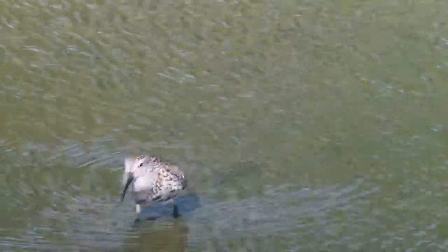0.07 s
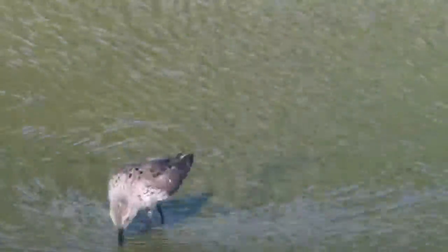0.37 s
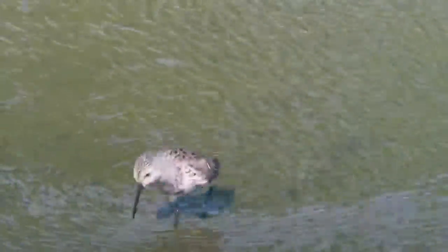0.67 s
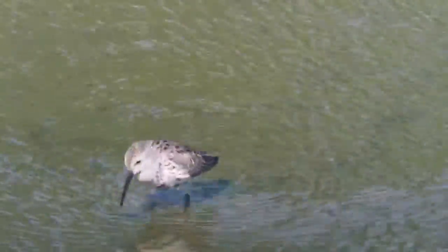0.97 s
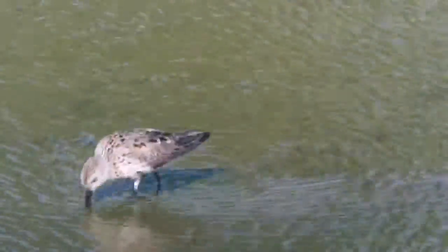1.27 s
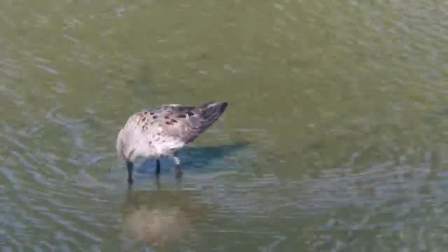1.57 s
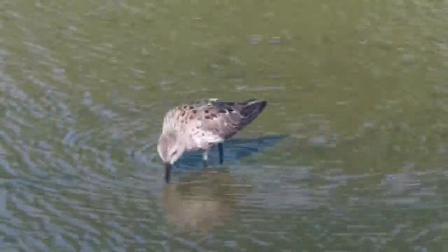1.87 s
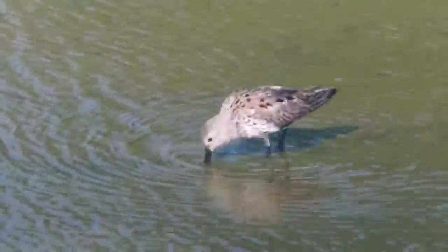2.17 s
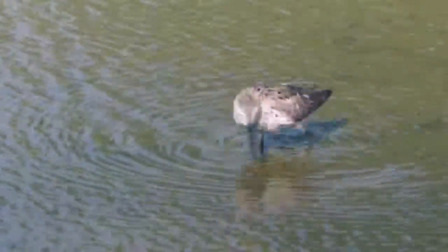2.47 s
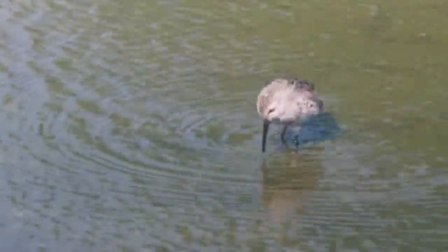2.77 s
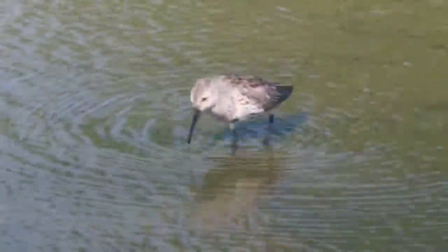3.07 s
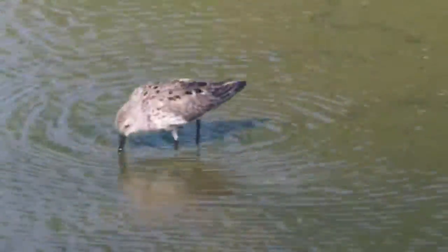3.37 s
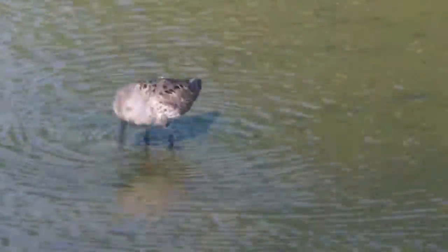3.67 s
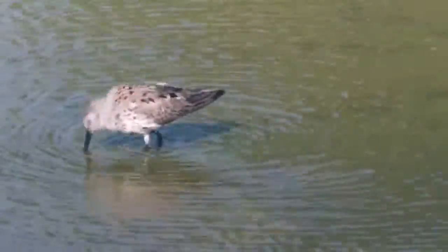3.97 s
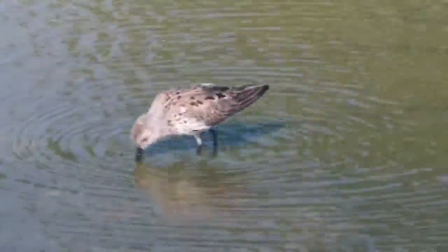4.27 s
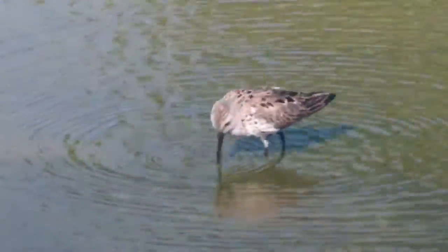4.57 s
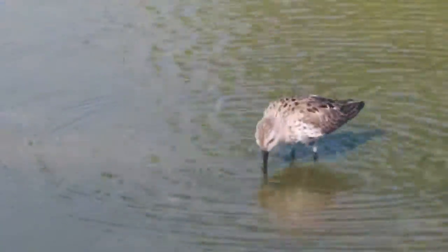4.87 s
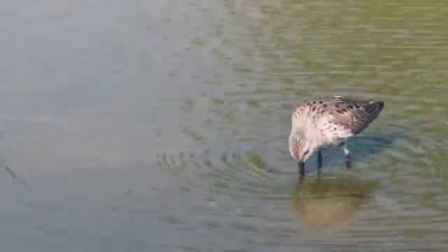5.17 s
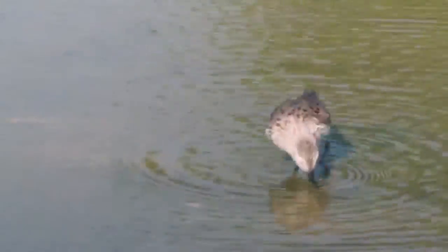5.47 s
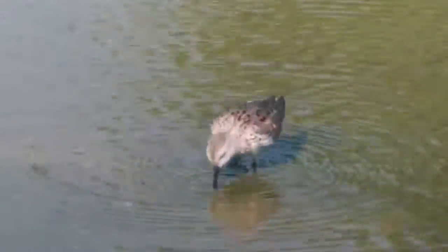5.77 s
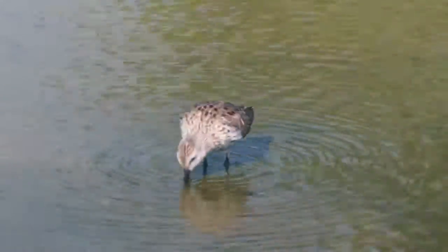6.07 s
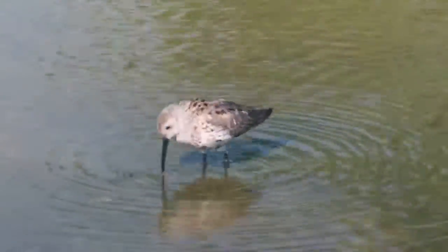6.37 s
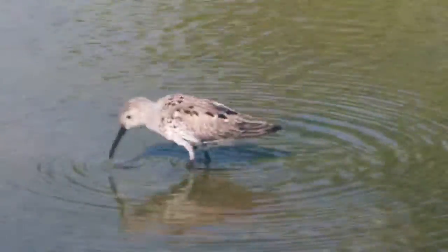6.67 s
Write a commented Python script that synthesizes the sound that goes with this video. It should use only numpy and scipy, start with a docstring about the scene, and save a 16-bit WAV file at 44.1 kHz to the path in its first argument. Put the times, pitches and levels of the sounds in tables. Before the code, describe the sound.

The sound cuts in almost at once with a puff of wind on the microphone, low rumbles and thumps jumping between left and right. Behind it lie a soft outdoor hiss and a far machine's low drone and thin hum. Distant shorebirds give faint, short, high peeps from 0.2 to 1.8 seconds. The wind buffets unevenly, then swells into its main gust from about 2.2 to 3.7 seconds, fluttering and sputtering, strongest near 2.8, while the background sinks beneath it. By about 4.3 seconds the wind has dropped and the hiss and machine come back, much quieter than the gust, broken by soft bass puffs. The drone swells briefly near 5.3 seconds. A few tiny dry ticks sound close by, the clearest at 5.4 and another at 6.5. The hum rises slightly before the end at about 6.8 seconds.

```python
"""Wind buffets the left and right openings (ports) of a microphone beside shallow water.
Swirls of air, called eddies, cross the ports: large ones rumble, small ones flutter, hard ones thump.
The wind veers from side to side, swells, and drops after four seconds. Behind it are an outdoor hiss,
the drone and hum of a far machine, distant bird peeps and a few tiny ticks.
The hiss and the machine sink under the gust and come back as the air calms."""
import sys
import numpy as np
from scipy import signal
from scipy.fft import rfft, irfft, next_fast_len
from scipy.io import wavfile
from scipy.ndimage import uniform_filter1d, map_coordinates

SR = 44100
rng = np.random.default_rng(int(sys.argv[2]) if len(sys.argv) > 2 else 0)


def waveform_to_disk(signal):
    """Save audio, clipped to [-1, 1], as 16-bit WAV at the path in sys.argv[1]."""
    frames = np.transpose(np.atleast_2d(signal))
    scaled = np.clip(frames, -1, 1) * 32767
    samples = np.round(scaled).astype(np.int16)
    wavfile.write(sys.argv[1], SR, samples)


N = 300762

# the background sinks under the gust and returns in the calm: time_s, gain_db
BACKGROUND_DIP = [(0.17, -3), (0.28, 0), (0.7, -1.5), (1.2, -1.1), (1.42, -2.5), (2.4, -4.5), (3.2, -3),
                  (3.42, -7), (5.05, 0.5), (5.9, 0), (6.8, 1.46)]
# the machine's hum rises and falls, and is strongest at the end: time_s, gain_db
HUM_RISE = [(0.2, -4.5), (0.55, 1), (1.6, -3), (2.65, 0.5), (3.6, -2), (4.6, -2), (5.25, 0.5), (5.6, 0.1),
            (5.9, -1.5), (6.25, -2), (6.62, 2.5), (6.8, 3.5)]


def wind(breakup_db=-17, rumble_boost_db=20, rumble_limit_db=-12.5):
    """Large eddies rumble; faster air breaks them into small ones that flutter, flap and sputter."""
    # wind strength through a first puff, a lull, the main gust and calm: time_s, level_db
    gust = [(0.18, -39), (0.4, -26), (0.52, -38), (0.8, -40), (1.1, -33.5), (1.27, -36.5), (1.37, -34.5),
            (1.46, -39), (1.56, -38), (1.67, -32), (1.85, -32), (1.96, -32), (2.12, -33.5), (2.24, -25.5),
            (2.39, -25.5), (2.58, -21.5), (2.78, -20.5), (3.12, -26), (3.28, -25), (3.7, -27.5),
            (3.88, -37.5), (4.3, -45), (4.6, -57.5), (6.8, -72.5)]
    # the wind swings from port to port: time_s, left_minus_right_db
    veer = [(0.22, -21), (0.36, 7), (0.72, 5), (0.93, 5), (1.5, -16.5), (1.76, -3.5), (2.0, -11), (2.3, -8),
            (2.45, 2), (2.8, 1), (3.1, 5), (3.45, -3), (3.95, 4.5), (4.45, 6.5)]
    # tone of the large eddies: frequency_hz, level_db
    rumble_tone = [(8, -8.5), (22, -3), (50, 3.5), (90, -1), (140, -4.5), (200, -9), (300, -16.5),
                   (500, -56), (1000, -88.5)]
    # tone of the small eddies: frequency_hz, level_db
    flutter_tone = [(90, -18), (170, -1), (260, 2), (380, 0), (500, -18), (640, -12), (830, -30),
                    (1050, -35), (1500, -50), (2200, -64), (5000, -80)]
    strength = amp(curves(gust))
    port_db = np.array([[.5], [-.5]]) * curves(veer)
    lumps_db = 2 * np.array([wobble(32), wobble(32.09)])  # quick, different on each port
    surges_db = wobble(9.1)  # slower, the same on both
    push = strength * amp(rumble_boost_db)
    push = push / np.hypot(1, push / amp(rumble_limit_db))  # the rumble levels off
    push = push / np.hypot(1, strength / amp(breakup_db))  # and thins as large eddies break up
    push = push * amp(0.61 * curves(BACKGROUND_DIP) + 0.8 * port_db)  # partly follows dip and veer
    rumble = push * turbulence(rumble_tone, burst_db=2.5, burst_rate=49, even_s=0.09)
    flutter = amp(-1) * turbulence(flutter_tone, burst_db=8.5, burst_rate=110, even_s=0.078)
    flaps = amp(-7.5) * small_eddies(per_second=130, pitch_hz=236, octaves=0.53)
    sputter_gain = amp(-15.5) * strength / amp(breakup_db)  # stands out at the height of the gust
    sputter = sputter_gain * small_eddies(per_second=200, pitch_hz=410, octaves=0.25)
    small_swirls = strength * amp(port_db) * (flutter + flaps + sputter)
    return unit(amp(lumps_db + surges_db)) * (rumble + small_swirls)


def turbulence(tone, burst_db, burst_rate, even_s):
    """Churning air gives each port its own noise in short bursts, evened out over even_s seconds."""
    bursts = amp(burst_db * np.array([wobble(burst_rate), wobble(burst_rate)]))
    pressure = filtered(bursts * rng.standard_normal((2, N)), lambda hz: amp(along(tone, hz)))
    power = np.abs(uniform_filter1d(pressure ** 2, max(int(even_s * SR), 64), axis=1))
    return unit(pressure / np.sqrt(uniform_filter1d(power, SR // 30, axis=1) + 1e-20))


def eddy(t, hz):
    """One eddy crosses a port: a sharp dip in pressure between two soft rises."""
    distance_squared = (np.pi * hz * t) ** 2
    return (3 * distance_squared - 1) / (1 + distance_squared) ** 3


def small_eddies(per_second, pitch_hz, octaves, max_count=3000):
    """Eddies of random size and strength hit each port at random moments."""
    out, near = np.zeros((2, N)), np.arange(-SR // 100, SR // 100)
    for port in out:
        chance = rng.random((max_count, 3))[:int(per_second * N / SR)]
        samples = (chance[:, :1] * N).astype(int) + near
        hz = pitch_hz * 2 ** (octaves * (2 * chance[:, 1:2] - 1))
        strength = np.sqrt(-np.log(1 - chance[:, 2:]) / hz)  # smaller, higher eddies are weaker
        pulses = strength * eddy(near / SR, hz)
        port += np.bincount((samples % N).ravel(), pulses.ravel(), N)
    return unit(out)


def buffets(thump_db=-2.5, puff_db=-17.5, puff_width_s=0.015, puff_lag_s=0.00091, puff_octaves=0.71):
    """The hardest eddies thump, most of them to one side, each inside a short puff of swirling air."""
    # the hardest eddies: time_s, level_db, pitch_hz, left_share (0 to 1)
    hard_eddies = [(0.178, -3.5, 118, 0), (0.2, -12, 58, 0), (0.233, -3.5, 175, 0.05), (0.249, -9, 200, 0),
                   (0.312, -2, 167, 1), (0.331, -8.5, 260, 1), (0.4, -3.5, 139, 0.36), (0.426, 1, 252, 1),
                   (0.574, 1, 195, 0.95), (0.585, -0.5, 57.7, 0.7), (0.621, -7, 85, 0.7),
                   (0.690, 1.5, 76, 0.3), (0.709, -11, 225, 0.15), (0.866, -1, 58, 0.6),
                   (0.876, -2, 214, 0.92), (0.887, -5.5, 104, 0.8), (0.929, -11, 115, 0.7),
                   (0.954, -17, 215, 1), (1.094, -4, 116, 0.26), (1.138, -3, 58, 0.9),
                   (1.147, -3.5, 101, 0.9), (1.354, -3, 146, 0.03), (1.372, 0.5, 124, 0.16),
                   (1.483, -21, 240, 0), (1.605, -2, 62, 0), (1.612, -3.5, 140, 0.04),
                   (1.709, -6.5, 146, 1), (1.764, -6, 111, 0.6), (1.775, -11.5, 180, 0),
                   (1.795, -8, 190, 0.8), (1.881, 1, 55.7, 0.3), (1.896, 3.5, 94, 0.37),
                   (1.906, -6, 118, 0), (1.934, -0.5, 130, 0.2), (2.001, 0, 163, 0), (2.01, -8, 280, 0),
                   (2.027, -2, 220, 0.03), (2.058, 0, 58, 0), (2.2, -10, 185, 0.1), (2.218, 1, 174, 0.83),
                   (2.29, 0.5, 102, 0), (2.297, 1.5, 126, 0.12), (2.323, -3.5, 362, 0.13),
                   (2.346, -4.5, 251, 0.2), (2.389, -12, 320, 0.86), (2.413, -1.5, 58, 1),
                   (2.435, -5, 286, 1), (2.471, -6.5, 300, 0.2), (2.494, -6.5, 358, 0.8),
                   (2.528, -6, 358, 0.24), (2.539, -4, 62, 1), (2.547, -6.5, 340, 0.9),
                   (2.611, -7.5, 279, 0.94), (2.633, -7.5, 420, 0.8), (2.671, -7, 360, 0),
                   (2.675, -1.5, 322, 0.87), (2.742, -17, 430, 0.2), (2.754, -0.5, 220, 0.9),
                   (2.770, -4, 386, 0), (2.812, 0, 60, 1), (2.822, -2, 212, 0), (2.841, -6, 260, 0.2),
                   (2.878, -4, 228, 0.85), (2.903, 3, 190, 0.88), (2.926, -11, 340, 0),
                   (2.941, -12, 430, 0.75), (2.975, -4.5, 307, 0.83), (3.0, -10.5, 335, 1),
                   (3.05, -10, 338, 1), (3.067, -2.5, 196, 0.94), (3.152, -12.5, 291, 0.9),
                   (3.171, -10, 308, 0.9), (3.262, -6.5, 350, 0.1), (3.268, -6, 280, 0.05),
                   (3.279, -6, 180, 0.2), (3.301, -5, 215, 0.4), (3.308, 4.5, 138, 0.9),
                   (3.403, 0.5, 140, 0.96), (3.44, -3.5, 342, 0.05), (3.501, -7.5, 285, 0.24),
                   (3.543, -5, 253, 0.23), (3.572, -11, 287, 0.2), (3.618, -6, 218, 1),
                   (3.669, -10.5, 209, 0.05), (3.689, 1.5, 113, 0.4), (3.72, -6.5, 215, 0.1),
                   (3.745, -13.5, 240, 1), (3.772, -10, 283, 1), (3.787, -1.5, 175, 0.9),
                   (3.859, -13, 65, 0.9), (3.938, -2.5, 86, 1), (3.975, -10, 220, 0.63),
                   (4.143, -9.5, 112, 0.2), (4.224, -10.5, 160, 1)]
    out, near = np.zeros((2, N)), np.arange(-SR // 8, SR // 8)
    grid_hz = np.fft.rfftfreq(len(near), 1 / SR) + 1
    swell = bell(near / SR - puff_lag_s, puff_width_s)
    for time_s, level_db, pitch_hz, left_share in hard_eddies:
        band = bell(np.log2(grid_hz / (0.8 * pitch_hz)), puff_octaves)  # a little below the thump
        puff = swell * irfft(rfft(rng.standard_normal((2, len(near)))) * band, len(near))
        puff = puff * np.linalg.norm(swell) / np.linalg.norm(puff, axis=1, keepdims=True)
        thump = amp(thump_db) * eddy(near / SR, pitch_hz) + amp(puff_db) * puff
        sides = np.array([[left_share], [1 - left_share]])
        out[:, round(time_s * SR) + near] += amp(level_db) * sides * thump
    return out


def throbs(pitch_hz=66, octaves=0.25, width_s=0.017):
    """Soft puffs of bass, the same on both ports, break up the rumble in the calm."""
    # bass puffs: time_s, level_db
    puffs = [(4.37, -25), (4.67, -26), (5.01, -27), (5.445, -24), (5.78, -26), (6.03, -27), (6.115, -30),
             (6.205, -27), (6.345, -25), (6.59, -26)]
    t = np.arange(N) / SR
    bass = filtered(rng.standard_normal(N), lambda hz: bell(np.log2((hz + 1) / pitch_hz), octaves))
    even_bass = bass / np.sqrt(np.abs(uniform_filter1d(bass ** 2, SR // 20)) + 1e-20)
    return even_bass * sum(amp(level_db) * bell(t - time_s, width_s) for time_s, level_db in puffs)


def birds(gain_db=-4.0, flicker_db=1.0, scatter_db=-3, scatter_s=0.19):
    """Far shorebirds peep in gliding whistles; gusty air on the way makes them flicker and scatter."""
    # peeps: start_s, length_s, start_hz, end_hz, sag (share of pitch lost at both ends), level_db
    peeps = [(0.238, 0.063, 3060, 3020, 0.01, -54), (0.375, 0.06, 3150, 3070, 0.017, -55),
             (0.523, 0.05, 2920, 3040, 0.01, -54), (0.654, 0.12, 3080, 3090, 0.05, -52),
             (0.79, 0.05, 3560, 3590, 0.041, -58), (0.865, 0.03, 3500, 3560, 0.005, -59),
             (0.96, 0.076, 2980, 3160, 0.016, -53), (1.07, 0.044, 3380, 3780, 0.01, -58.5),
             (1.12, 0.06, 3080, 2950, 0.003, -54), (1.185, 0.039, 2830, 3000, 0.005, -52.5),
             (1.205, 0.025, 3700, 3380, 0.005, -58.5), (1.659, 0.06, 3100, 3160, 0.005, -58),
             (1.75, 0.05, 3370, 3640, 0.0046, -60.5)]
    out, t = np.zeros(N), np.arange(SR // 4) / SR
    for start_s, length_s, start_hz, end_hz, sag, level_db in peeps:
        position = np.linspace(-1, 1, int(length_s * SR))
        hz = np.linspace(start_hz, end_hz, len(position)) * (1 - sag * position ** 2)
        fade = np.sqrt(np.abs(np.cos(np.pi * position / 2)))
        whistle = fade * np.sin(2 * np.pi * np.cumsum(hz) / SR)
        out[round(start_s * SR):][:len(whistle)] += amp(level_db + gain_db) * unit(whistle)
    out = out * unit(amp(flicker_db * wobble(70.2)))
    tail = rng.standard_normal((2, len(t))) * amp(-60 * t / scatter_s)
    scattered = signal.fftconvolve(out[None], tail / np.linalg.norm(tail[0]), axes=1)[:, :N]
    return out + amp(scatter_db) * scattered


def ticks(fade_s=0.0022, dull_hz=7000):
    """A few tiny dry clicks close by, each a burst of noise with its treble softened."""
    # clicks: start_s, level_db
    clicks = [(3.309, -33.5), (5.296, -34.5), (5.387, -21), (6.492, -30)]
    out, t = np.zeros((2, N)), np.arange(SR // 50) / SR
    for start_s, level_db in clicks:
        click = rng.standard_normal((2, len(t))) * amp(-60 * t / fade_s)
        out[:, round(start_s * SR):][:, :len(t)] += amp(level_db) * click / np.abs(click).max()
    return filtered(out, lambda hz: 1 / (1 + 1j * hz / dull_hz))


def machine(drone_hz=59.53, waver_hz=0.813, hum_hz=116.6, swell_at_s=5.27):
    """A far machine: a low, wavering drone that swells once, and a thin hum."""
    # the tones that make up the hum: multiple (of hum_hz), level_db
    overtones = [(4, -57), (9, -53), (10, -63.5), (12, -62.5), (14, -68)]
    t = np.arange(N) / SR
    phase = 2 * np.pi * np.cumsum(drone_hz + waver_hz * wobble(9)) / SR
    swell_db = 12 * bell(t - swell_at_s, width=0.13)
    drone = amp(-36.5 + swell_db + 1.9 * wobble(8.7)) * unit(np.sin(phase))
    cycles = hum_hz * t + .003 * wobble(2)
    hum = np.zeros(N)
    for multiple, level_db in overtones:
        gain = amp(level_db + 0.7 * wobble(4.7))  # each fades on its own as the air shifts
        hum += gain * unit(np.sin(2 * np.pi * round(multiple) * cycles))
    return drone + amp(curves(HUM_RISE)[0]) * hum


def background():
    """Air hisses over the water, with a far rumble, a rush, a whine and the machine; all dip together."""
    # tone of the far rumble: frequency_hz, level_db
    low_tone = [(10, -10.5), (35, -0.5), (60, -1.5), (110, 1.5), (190, -5), (260, -10.5), (360, -12.5),
                (470, -20), (700, -46.5), (2000, -90)]
    # tone of the mid-pitched rush: frequency_hz, level_db
    rush_tone = [(250, -7), (500, -8.5), (700, -4), (880, -6), (1010, -0.5), (1130, -6), (1280, -6.5),
                 (1600, -13), (2000, -23), (3000, -48), (6000, -92)]
    # narrow whine around the hum's strongest overtone: frequency_hz, level_db
    whine_tone = [(850, -45.5), (985, -3.5), (1050, 3.5), (1100, -10), (1220, -47)]
    # tone of the hissing air: frequency_hz, level_db
    hiss_tone = [(1200, -14.5), (1950, -6.5), (2500, 1), (2800, -2.5), (3080, 3), (3330, -6), (3800, -2.5),
                 (4600, -10.5), (6400, -16.5), (7450, -13), (8400, -20), (10200, -17.5), (11200, -27.5),
                 (12400, -22), (15700, -30)]
    # thin, high ring in the hiss: frequency_hz, level_db
    ring_tone = [(2750, -30), (2980, -3), (3080, -2.5), (3180, -4), (3350, -34.5)]
    # the ring fades and returns: time_s, level_db
    ring_fade = [(0.3, -53), (1.3, -55), (2.2, -57), (4.8, -66), (5.8, -59), (6.7, -53.5)]
    low = amp(-30.5 + 0.94 * wobble(13)) * distant(low_tone, patchy_db=-0.5)
    rush = amp(-40.5) * distant(rush_tone, patchy_db=0.75)
    whine_db = -51.5 + 2.9 * curves(HUM_RISE)  # swells with the hum, but more widely
    whine = amp(whine_db) * distant(whine_tone, patchy_db=-0.5)
    hiss = amp(-45.5) * distant(hiss_tone, patchy_db=0.92)
    ring = amp(curves(ring_fade)) * distant(ring_tone, patchy_db=1.5)
    return amp(curves(BACKGROUND_DIP)) * (low + rush + whine + hiss + ring + machine())


def distant(tone, patchy_db, lag_s=0.00013):
    """Far noise with slow louder and softer patches; it reaches the right port first."""
    # which side is louder: frequency_hz, left_minus_right_db
    balance = [(380, 0.5), (700, -3.5), (1150, 3.5), (2000, -3.5), (4400, -2), (8100, .5), (15000, -5.5)]
    # how alike the two sides are: frequency_hz, likeness (0 to 1)
    likeness = [(130, 1), (600, 0.89), (1200, 0.85), (1800, 0.2), (2400, 0.37), (2900, 0.16), (3400, 0.6),
                (4700, 0.98), (5800, 0.31), (11000, 0.27), (14000, .1)]
    slices = signal.stft(rng.standard_normal((2, N)), nperseg=512)[2]
    patches = uniform_filter1d(rng.standard_normal(slices.shape[1:]), size=5, axis=0)  # smooth in pitch
    patches = uniform_filter1d(patches, size=18, axis=1)  # and in time
    noise = signal.istft(slices * amp(patchy_db * unit(patches)), nperseg=512)[1][:, :N]

    def split(hz):
        angle = np.arccos(np.clip(along(likeness, hz), -1, 1)) / 2
        return amp(along(tone, hz)) * np.array([np.cos(angle), np.sin(angle)])

    shared, opposed = filtered(noise, split)
    half = np.array([[.5], [-.5]])
    ports = lambda hz: amp(half * along(balance, hz)) * np.exp(-2j * np.pi * hz * half * lag_s)
    return unit(filtered(np.array([shared + opposed, shared - opposed]), ports))


def amp(db):
    """Turn decibels into a gain to multiply by."""
    return 10 ** (np.asarray(db) / 20)


def unit(x):
    """Scale a signal to an average power of 1."""
    return x / np.sqrt(np.mean(x ** 2) + 1e-20)


def bell(x, width):
    """A smooth hump, 1 high where x is 0."""
    return np.exp(-.5 * (x / width) ** 2)


def along(points, hz):
    """Read between (frequency_hz, value) points, with octaves evenly spaced."""
    points_hz, values = np.transpose(points)
    return np.interp(np.log(hz + 1), np.log(points_hz + 1), values)


def curves(rows):
    """Join (time_s, value) points with straight lines, one value per sample."""
    times_s, *columns = np.transpose(rows)
    return np.array([np.interp(np.arange(N) / SR, times_s, column) for column in columns])


def wobble(rate):
    """A smooth curve through rate random points a second."""
    return map_coordinates(rng.standard_normal(int(N * rate / SR) + 4), [np.arange(N) * rate / SR])


def filtered(x, response):
    """Scale and delay each frequency in x as response(hz) says."""
    size = next_fast_len(N + SR // 2)
    return irfft(rfft(x, size) * response(np.fft.rfftfreq(size, 1 / SR)), size)[..., :N]


def scene():
    """Wind on the ports, over the far background, birds and ticks."""
    return wind() + buffets() + throbs() + background() + birds() + ticks()


def record(dry, start_s=0.156, ceiling=0.97, top_hz=15800):
    """The sound cuts in after a short silence; its peaks are rounded and its highest treble is cut."""
    live = dry * (np.arange(N) / SR >= start_s)
    rounded = live / (1 + np.abs(live / ceiling) ** 6) ** (1 / 6)
    return filtered(rounded, lambda hz: hz < top_hz)


dry = scene()
out = record(dry)
waveform_to_disk(out)
```